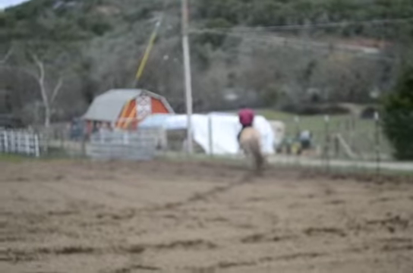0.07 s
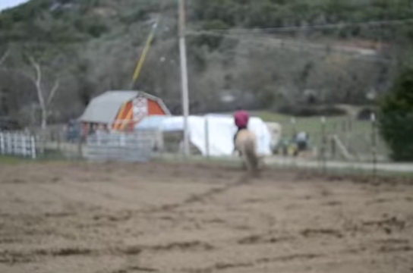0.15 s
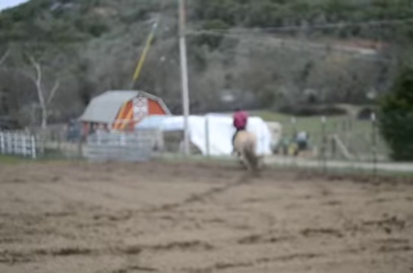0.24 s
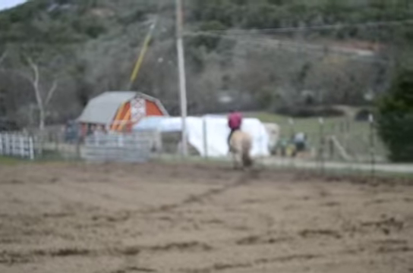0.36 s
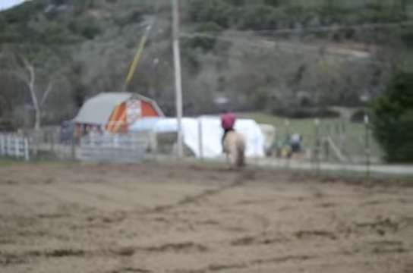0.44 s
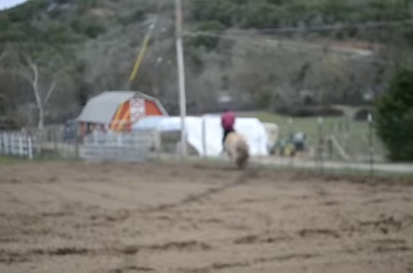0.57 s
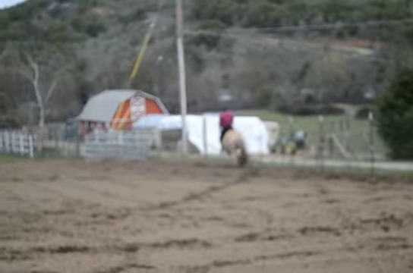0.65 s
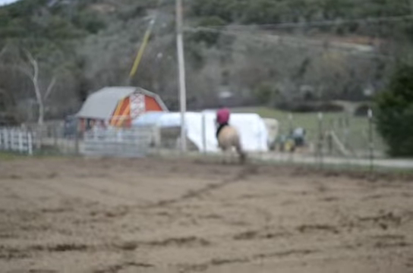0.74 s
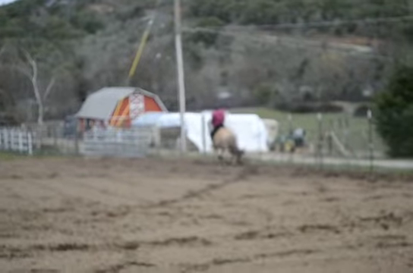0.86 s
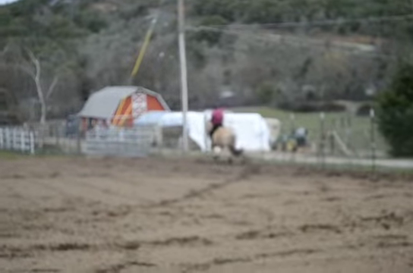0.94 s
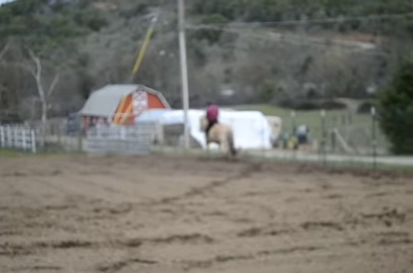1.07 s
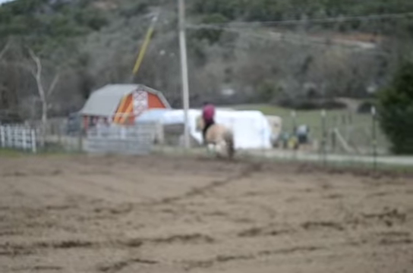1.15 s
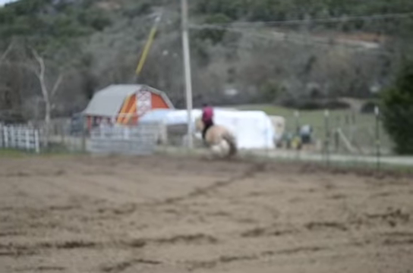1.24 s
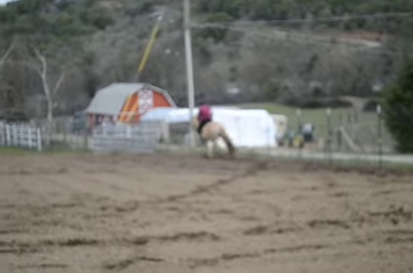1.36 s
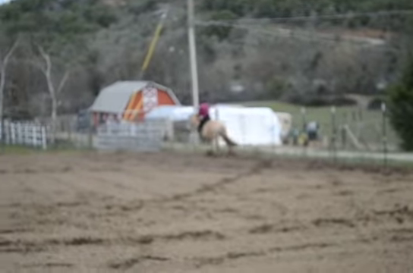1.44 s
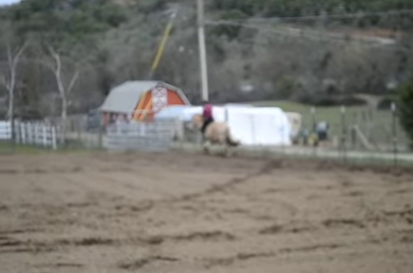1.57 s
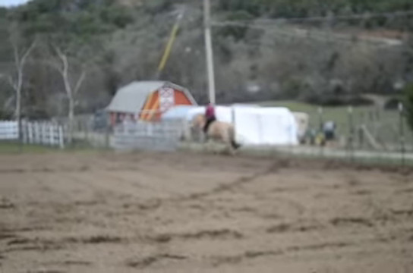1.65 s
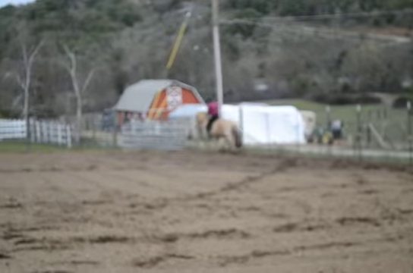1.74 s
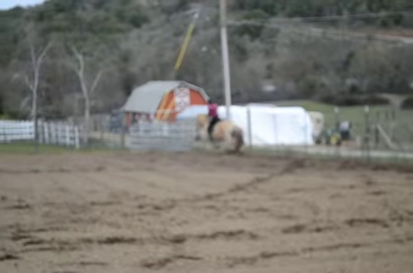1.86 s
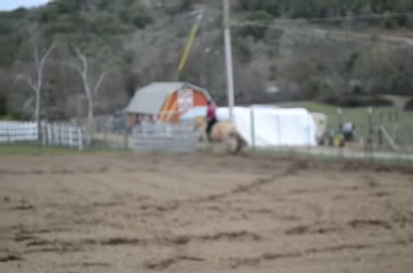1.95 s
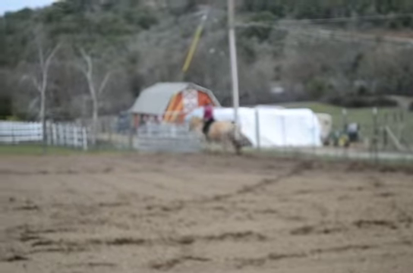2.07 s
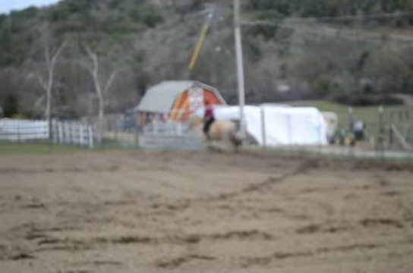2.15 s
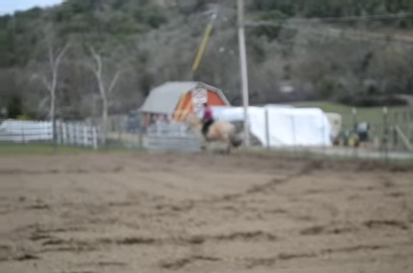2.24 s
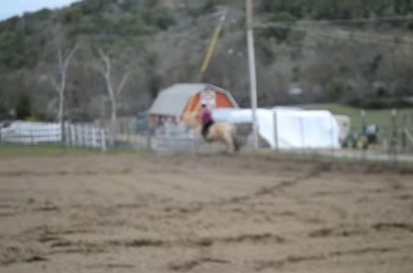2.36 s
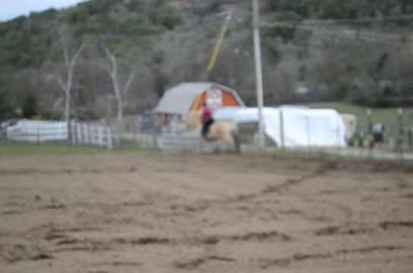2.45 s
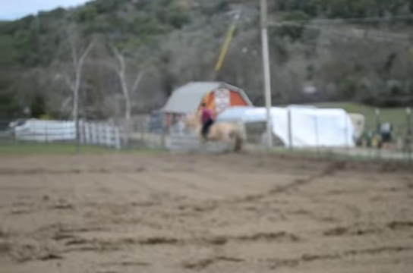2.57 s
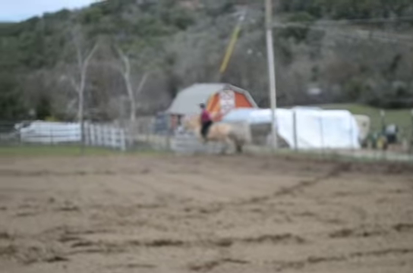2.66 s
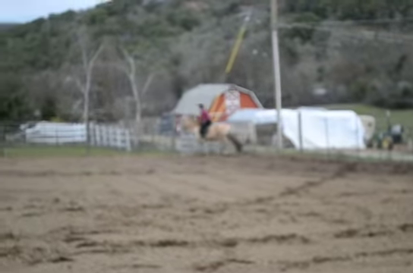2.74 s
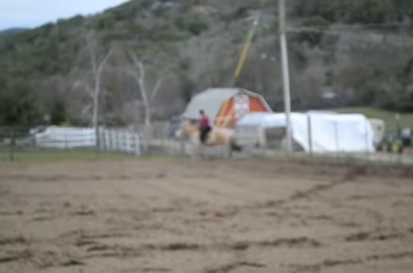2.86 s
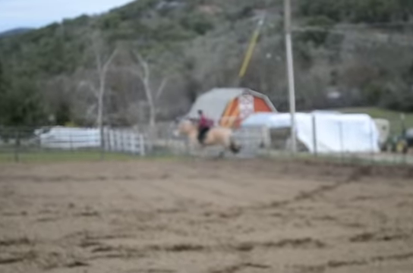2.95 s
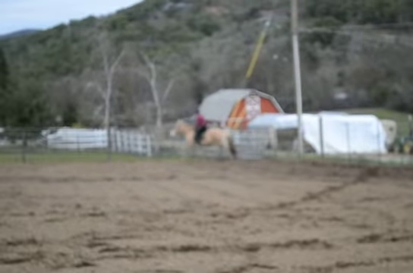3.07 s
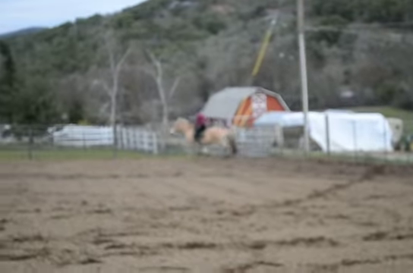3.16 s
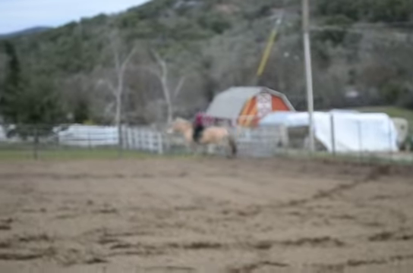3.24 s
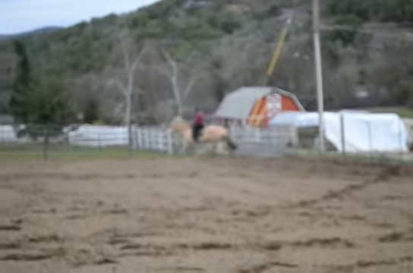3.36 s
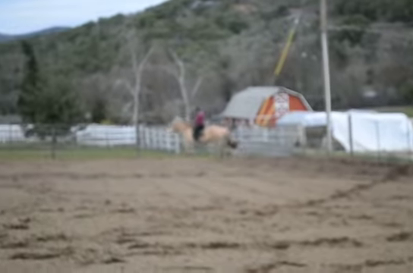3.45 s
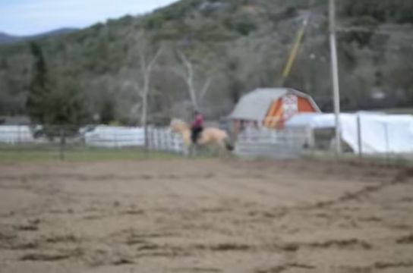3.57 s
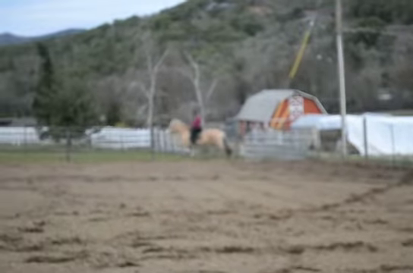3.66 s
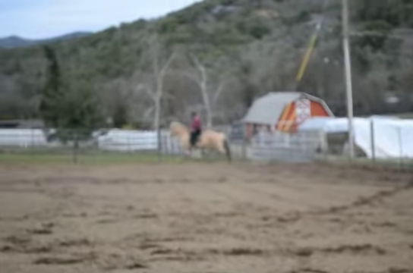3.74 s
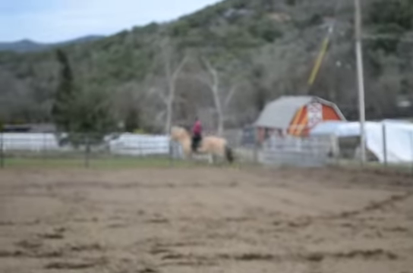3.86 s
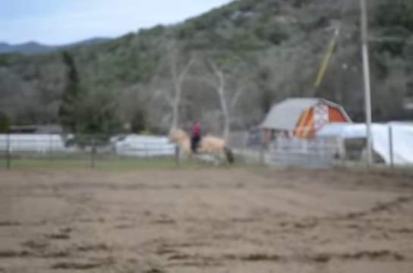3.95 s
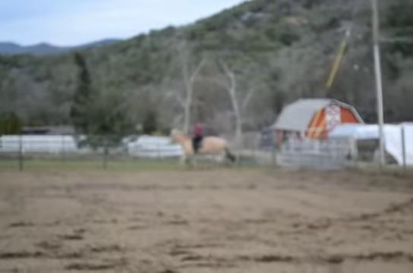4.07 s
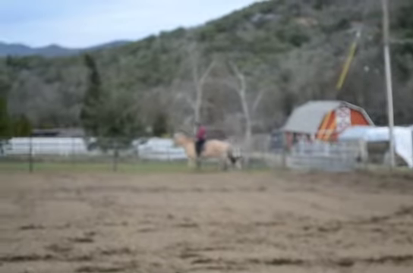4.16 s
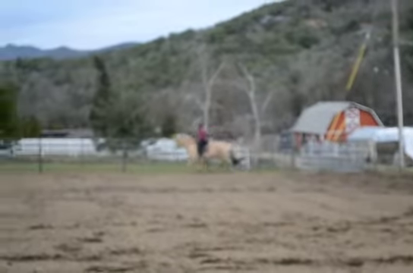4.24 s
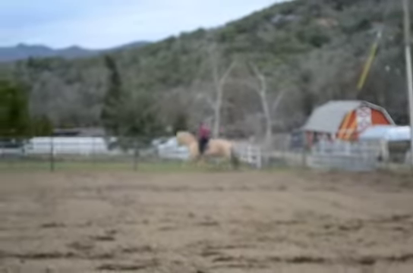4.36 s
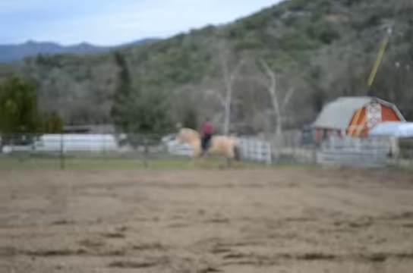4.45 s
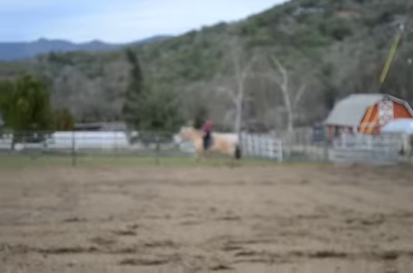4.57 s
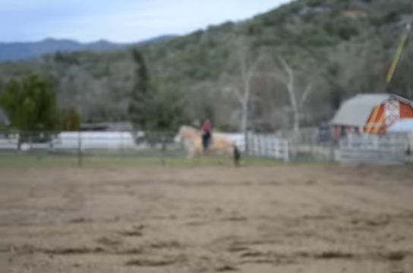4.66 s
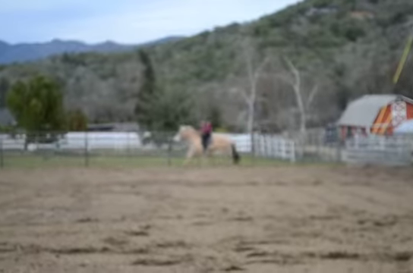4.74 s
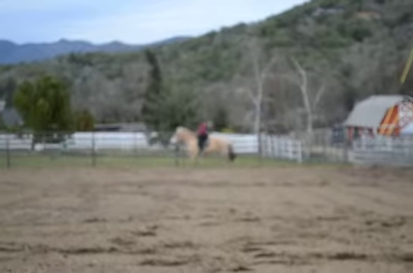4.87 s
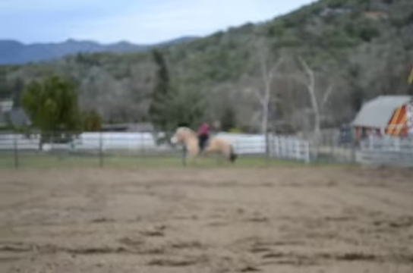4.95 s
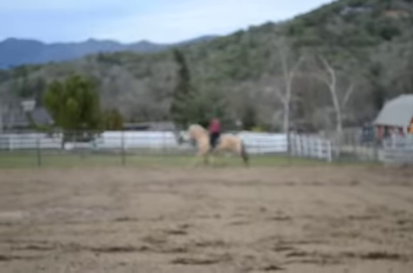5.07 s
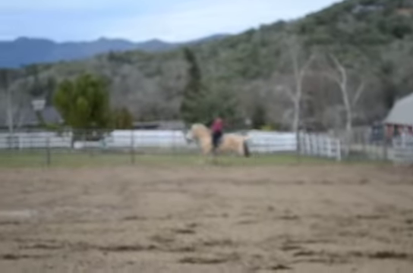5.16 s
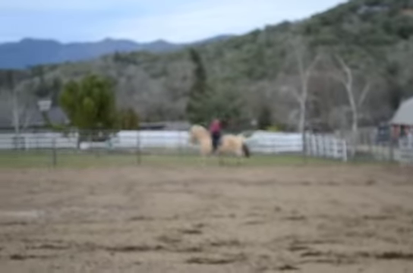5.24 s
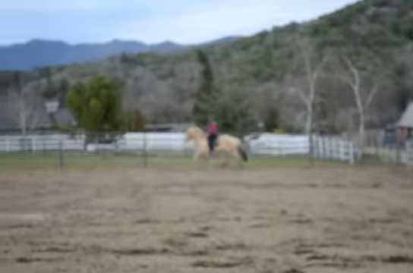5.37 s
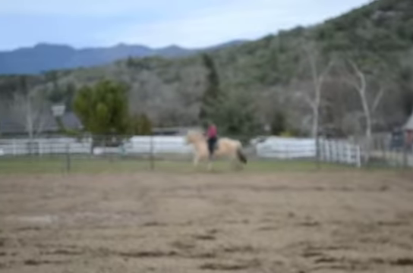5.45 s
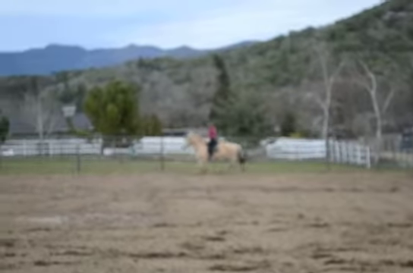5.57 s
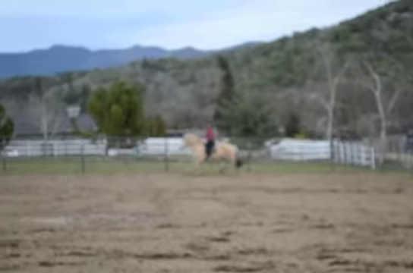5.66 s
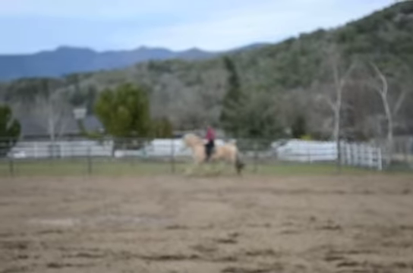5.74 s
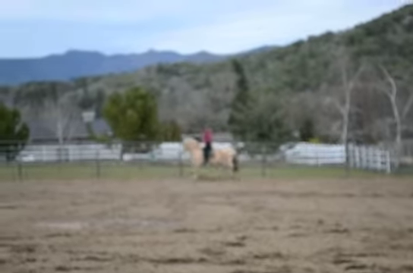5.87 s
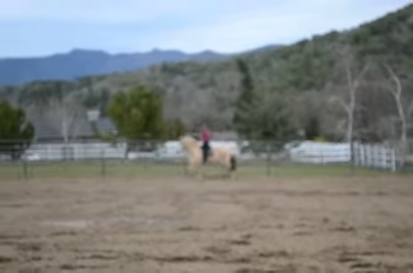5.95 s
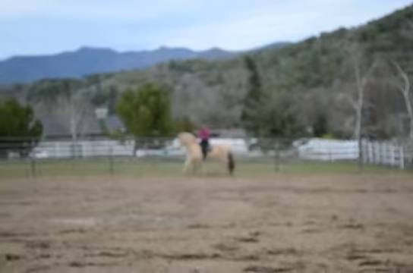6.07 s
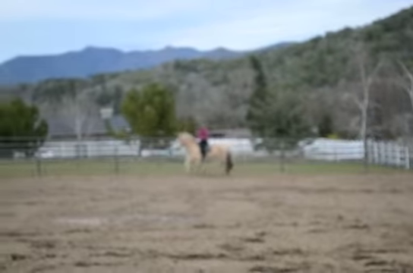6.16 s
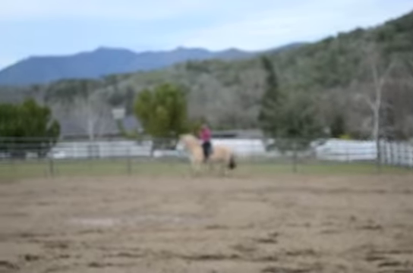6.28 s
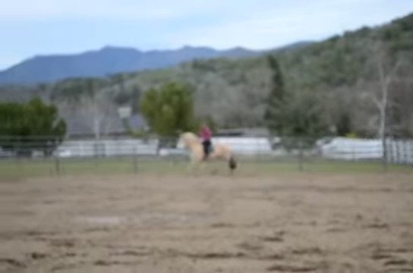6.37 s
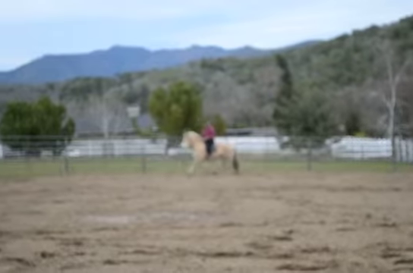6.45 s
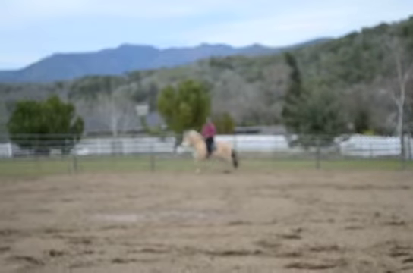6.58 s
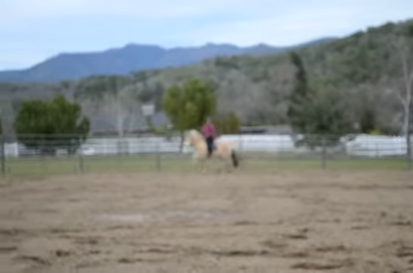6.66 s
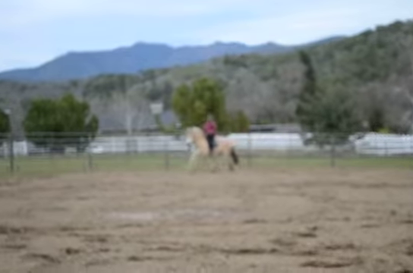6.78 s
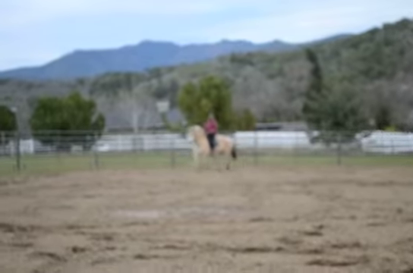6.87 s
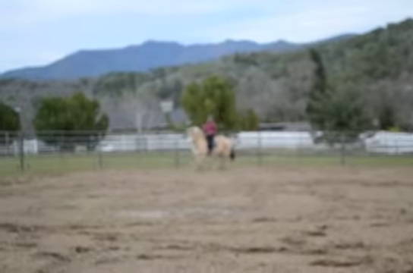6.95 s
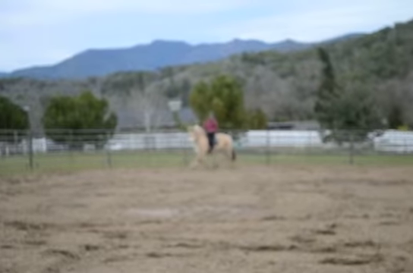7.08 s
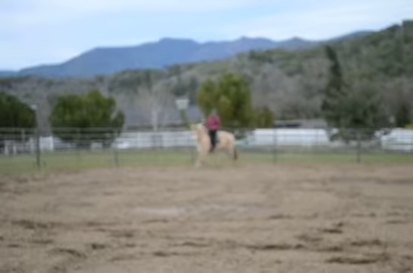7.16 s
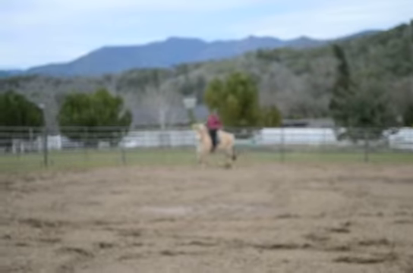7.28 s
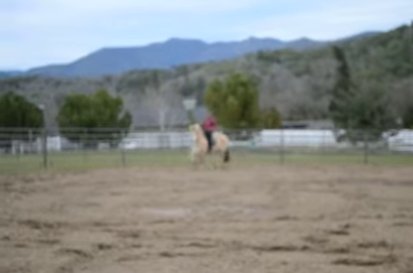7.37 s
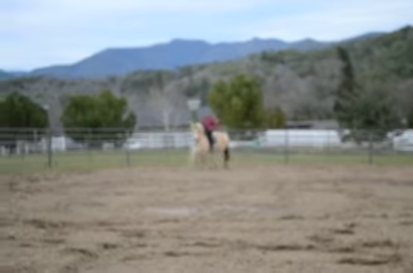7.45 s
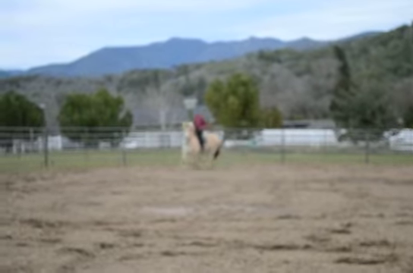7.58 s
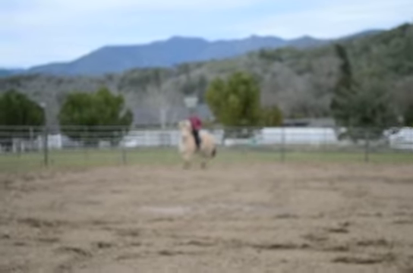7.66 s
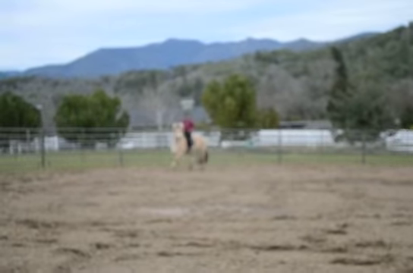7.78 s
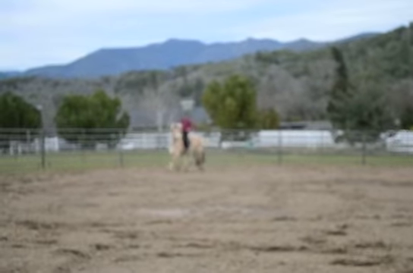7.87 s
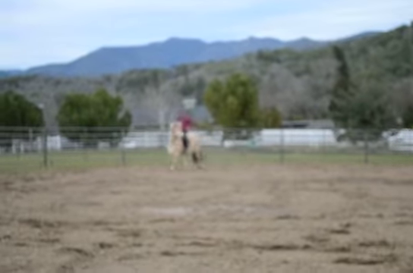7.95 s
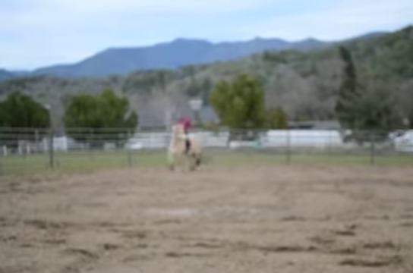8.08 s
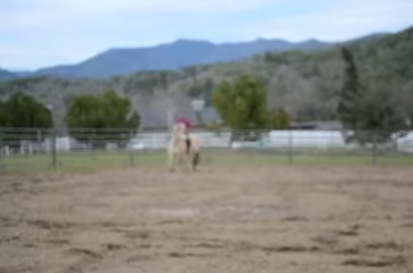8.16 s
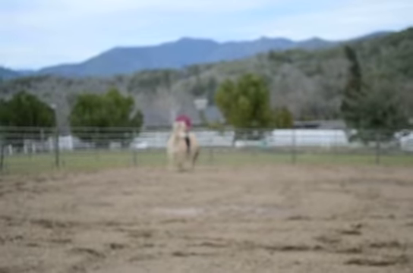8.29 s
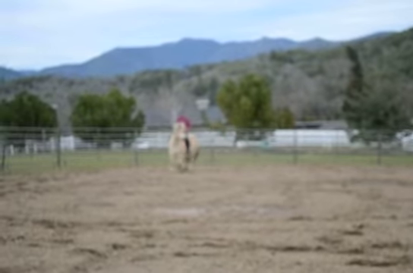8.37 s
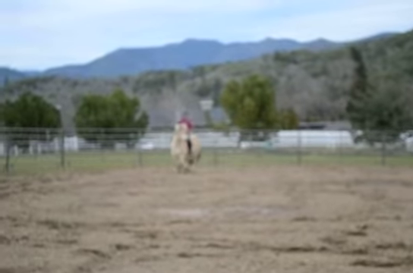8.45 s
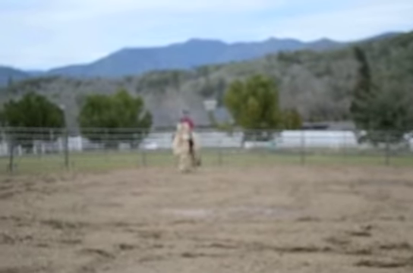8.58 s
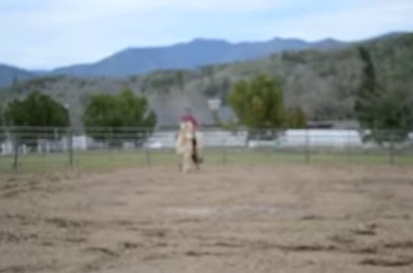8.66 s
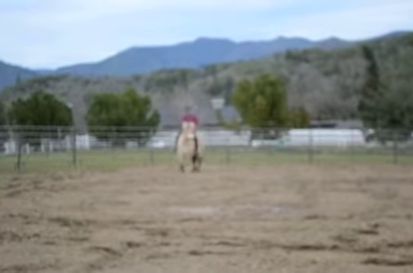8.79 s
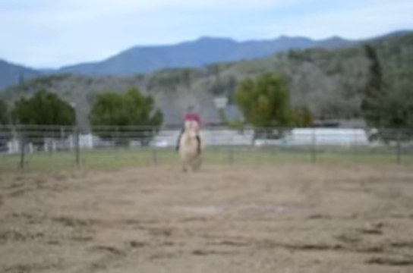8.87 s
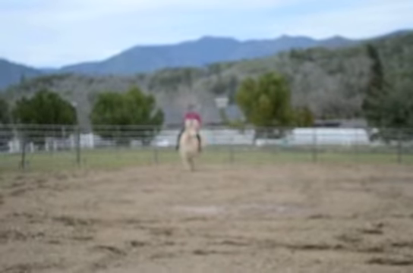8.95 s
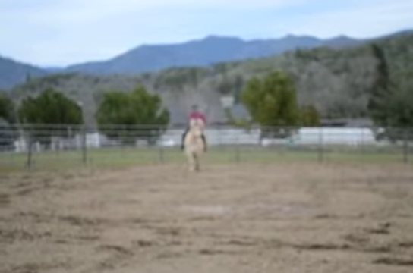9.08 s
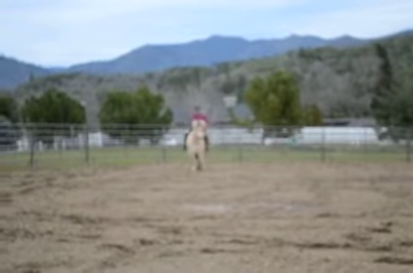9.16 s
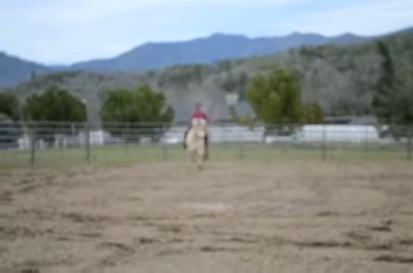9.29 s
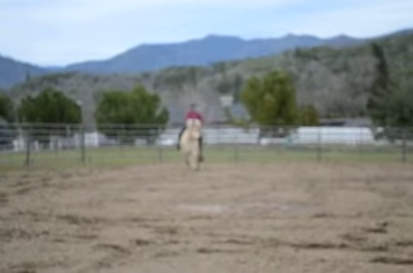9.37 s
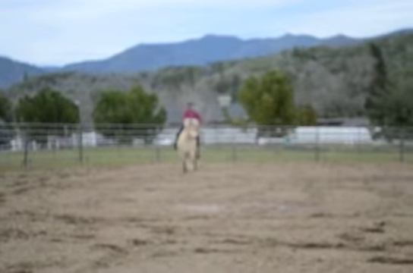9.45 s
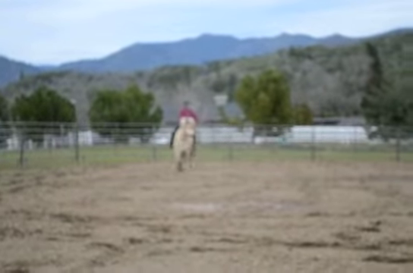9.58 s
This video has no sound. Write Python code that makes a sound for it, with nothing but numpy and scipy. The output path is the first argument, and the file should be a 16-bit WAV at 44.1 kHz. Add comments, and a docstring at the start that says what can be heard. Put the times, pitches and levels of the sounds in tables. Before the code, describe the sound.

Open-air valley ambience, quiet at first: soft distant hum, leaf hiss and faint far birds. A brief wind bump comes at 0.1 s and a hard plastic camera click near 0.4 s, with smaller ticks afterwards. Hoarse fluttering crow caws sound at about 0, 0.5, 1.0, 1.6 and 2.2 s, amid short whistles, falling songs and thin high trills. Far hooves scuff sand throughout, irregular, soft, grainy and barely audible. Rapid double chips run around 3-3.5 s and 4.8-5.5 s. A hollow woodpecker roll lasts from 4.45 to 4.75 s; another at 7.2-7.6 s carries bright ticks. Crows return at 6.3, 6.8, 6.9, 7.3, 7.7 and 8.3 s, mostly stronger, with a clear rising whistle at 6.5 s and buzzy rattles later. From about 6.2 s, breeze rumbles and pops low on the microphone, dominating until the end at roughly 9.6 s.

```python
"""A horse's hooves scuff faintly, far off on a sand arena: noise puffs full of short ringing grains. Crows caw
with fluttering harmonics; songbirds whistle, rattle, wheeze and chip with swept and shaken sines. A woodpecker
drums in two bursts, noisy blows through wood resonances, each led by a thin crack. Behind lie distant hum and
leaf hiss; a rising breeze rumbles and pops on the microphone of a handheld camera, whose body ticks now and
then."""
import sys
import numpy as np
from scipy import signal
from scipy.fft import rfft, irfft, next_fast_len
from scipy.io import wavfile
from scipy.ndimage import uniform_filter1d, map_coordinates

SR = 44100
rng = np.random.default_rng(int(sys.argv[2]) if len(sys.argv) > 2 else 0)


def waveform_to_disk(signal):
    """Save audio, clipped to [-1, 1], as 16-bit WAV at the path in sys.argv[1]."""
    frames = np.transpose(np.atleast_2d(signal))
    scaled = np.clip(frames, -1, 1) * 32767
    samples = np.round(scaled).astype(np.int16)
    wavfile.write(sys.argv[1], SR, samples)


def natural_amplitude(level_db):
    """Convert a level in decibels to a linear amplitude factor, elementwise."""
    exponent = np.asarray(level_db, float) / 20
    return 10 ** exponent


N = 424241  # samples
T = np.arange(N) / SR  # s


def unit(x):
    """Scaled to rms 1."""
    return x / np.sqrt(np.mean(x ** 2) + 1e-20)


def along(points, hz):
    """Reads (Hz, value) points on a log frequency axis."""
    f, v = np.transpose(points)
    return np.interp(np.log(hz + 1), np.log(f + 1), v)


def wobble(rate, n=N):
    """A smooth random curve, rate knots a second."""
    knots = rng.standard_normal(int(n * rate / SR) + 4)
    return map_coordinates(knots, [np.arange(n) * rate / SR])


def filtered(x, response):
    """Shapes x by a response, a function of frequency."""
    m = next_fast_len(len(x) + 8192)
    return irfft(rfft(x, m) * response(np.fft.rfftfreq(m, 1 / SR)), m)[:len(x)]


def modes(table):
    """Causal response of (Hz, width Hz, dB) resonances, summed with alternating sign."""
    def response(f):
        return sum((-1) ** k * natural_amplitude(db) * 1j * f * width / (centre ** 2 - f * f + 1j * f * width)
                   for k, (centre, width, db) in enumerate(table))
    return response


def noise(spectrum, patchy_db):
    """Coloured noise of rms 1 with time-frequency patches of random gain."""
    z = signal.stft(rng.standard_normal(N + 512), nperseg=512)[2]
    field = uniform_filter1d(rng.standard_normal(z.shape), size=6, axis=0)
    field = uniform_filter1d(field, size=6, axis=1)
    x = signal.istft(z * natural_amplitude(patchy_db * unit(field)), nperseg=512)[1][:N]
    return unit(filtered(x, lambda hz: natural_amplitude(along(spectrum, hz))))


def add(out, s, sound):
    """Lays a sound into out at time s."""
    part = out[max(round(s * SR), 0):][:len(sound)]
    part += sound[:len(part)]


def phase(hz):
    """A running phase in radians that follows a changing pitch."""
    return 2 * np.pi * np.cumsum(hz) / SR


def phrase(rows):
    """Start time, soft-edged gate and per-sample columns of one call."""
    s, *cols = np.transpose(rows)
    t = np.arange(s[0], s[-1], 1 / SR)
    gate = np.clip(np.minimum(t - s[0], s[-1] - t) / 0.002, 0, 1)
    return s[0], gate, [np.interp(t, s, c) for c in cols]


def note(s, length, first_hz, last_hz, db):
    """A straight pitch glide that swells quickly and fades."""
    crest, start_db, end_db = .3, -1.5, -6.5  # share of the length; levels against the crest
    mid_hz = first_hz + crest * (last_hz - first_hz)
    return phrase([(s, first_hz, db + start_db),
                   (s + crest * length, mid_hz, db),
                   (s + length, last_hz, db + end_db)])


def air():
    """Distant hum and leaf hiss, each coloured noise drifting in level, over a faint steady tone."""
    # far sounds of the valley: start_s, hum_level_db, hiss_level_db
    valley = [(0, -56, -58.5), (.83, -62, -61.5), (1.77, -57.5, -62), (2.62, -63.5, -63.5),
              (3.27, -59, -62.5), (4.2, -60, -67), (4.61, -57, -64), (5.1, -61.5, -66.5), (6.3, -64, -65),
              (7.3, -63, -59), (8.84, -64.5, -63.5), (9.62, -64.5, -62)]
    # colour of the distant hum: frequency_hz, relative_level_db
    hum_colour = [(35, -29), (60, -15.5), (128, -12.5), (428, -6.5), (692, 3), (874, -2.5), (1020, 0.5),
                  (1490, -11.5), (1600, -17.5), (2080, -49), (3520, -120)]
    # colour of the leaf hiss: frequency_hz, relative_level_db
    hiss_colour = [(710, -25.5), (1200, -0.5), (1530, -1.5), (1720, -1.5), (2030, -3.5), (2760, -5.5),
                   (5630, -19), (7220, -20.5), (7990, -29.5), (8770, -25.5), (11000, -42.5), (14200, -72),
                   (22000, -120)]
    # the steady tone: pitch_hz, rms_level_db
    drone_hz, drone_db = (78, -83.5)
    s, hum_db, hiss_db = np.transpose(valley)
    hum = natural_amplitude(wobble(8)) * noise(hum_colour, patchy_db=.8)
    hiss = natural_amplitude(1.4 * wobble(14)) * noise(hiss_colour, patchy_db=1.4)
    tone = natural_amplitude(drone_db) * np.sqrt(2) * np.sin(2 * np.pi * drone_hz * T)
    return natural_amplitude(np.interp(T, s, hum_db)) * hum + natural_amplitude(np.interp(T, s, hiss_db)) * hiss + tone


def chorus():
    """Many distant birds: faint short sine glides at random pitches and moments."""
    out = np.zeros(N)
    for when, pitch, slope, long, size in rng.random((420, 5)):
        length_s = .012 + .07 * long ** 2
        u = np.arange(0, 1, 1 / (length_s * SR))
        hz = 2300 * np.exp(1.15 * pitch)
        glide = 1 + 0.3 * (slope - .6) * u
        level_db = -63 - 12 * pitch - 9 * size  # the higher, the fainter
        add(out, when * N / SR, natural_amplitude(level_db) * np.sin(np.pi * u) * np.sin(phase(hz * glide)))
    return out


def ticks():
    """Plastic creaks of the camera body: noise cracks of a few milliseconds, and a snap that rings it."""
    # clearest creaks: start_s, level_db (before the crack's own gain and bass cut)
    creaks = [(.4239, -49), (.7921, -52.5), (1.044, -59), (1.0974, -45.5), (1.1897, -59.5), (2.5127, -55),
              (4.0277, -63), (4.4283, -56), (5.4794, -60), (5.8042, -65), (6.7012, -58.5)]
    # resonances of the camera body: centre_hz, width_hz, relative_level_db
    shell = [(450, 300, -4), (1550, 130, 0), (1950, 150, -1), (2300, 170, -3), (3800, 2000, -14)]
    # one hard snap that rings the whole body: start_s, peak_db
    snap_s, snap_db = (.4245, -28)
    out, t = np.zeros(N), np.arange(SR // 40) / SR
    faint = rng.random((90, 2)) * [N / SR, -8] + [0, -66]  # many more, barely heard
    for s, db in [*creaks, *faint]:
        crack = rng.standard_normal(len(t)) * natural_amplitude(-60 * t / 0.0094)
        add(out, s, natural_amplitude(db + 7.0) * filtered(crack, lambda f: 1j * f / (1j * f + 2500)))
    blow = natural_amplitude(-60 * t / .0006) + .15 * natural_amplitude(-60 * t / .015) * rng.standard_normal(len(t))
    ring = filtered(blow, modes(shell))
    add(out, snap_s, natural_amplitude(snap_db) * ring / abs(ring).max())
    return out


def breeze():
    """Eddies push the membrane: lumpy rumble, deep sway and sharp-crested pushes of about one cycle."""
    # breeze strength at the microphone, which each layer offsets: start_s, level_db
    strength = [(0, -67), (.1, -46.5), (.18, -74), (1.1, -70), (1.9, -65.5), (2.1, -68), (2.24, -65),
                (2.6, -71), (2.85, -68), (3.8, -82), (4.18, -72.5), (4.38, -55.5), (4.55, -63.5),
                (4.96, -71), (5.06, -60.5), (5.14, -62), (5.26, -56.5), (5.38, -72), (5.62, -57.5),
                (5.85, -49.5), (6.05, -57.5), (6.3, -42), (6.4, -56.5), (6.67, -40), (6.75, -54),
                (6.83, -45.5), (7.07, -42), (7.21, -62), (7.34, -40), (7.58, -40.5), (7.75, -46.5),
                (7.98, -39.5), (8.49, -38.5), (8.63, -56), (8.68, -42), (8.73, -51), (8.8, -39),
                (9.1, -39.5), (9.2, -38), (9.5, -44), (9.62, -30.5)]
    # colour of the lumpy rumble: frequency_hz, relative_level_db
    buffet_colour = [(41, -35), (70, 5), (225, 1), (318, -12.5), (397, -10), (856, -22), (1000, -40.5),
                     (1300, -58.5), (2200, -120)]
    # colour of the deep sway: frequency_hz, relative_level_db
    deep_colour = [(12, -24), (30, -11.5), (70, -6.5), (110, -4), (200, -52.5), (400, -120)]
    # strongest wind pops: centre_s, level_db (before the push shape and low cut), centre_hz
    strong_pops = [(.09, -30, 178), (.118, -41.5, 150), (5.075, -42.5, 90), (5.281, -36.5, 117),
                   (5.65, -42, 110), (5.853, -37.5, 195), (5.998, -44, 203), (6.124, -38.5, 188.4),
                   (6.212, -31.5, 183), (6.26, -32, 124), (6.28, -28, 204), (6.307, -31.5, 181.5),
                   (6.577, -23, 286), (6.658, -24.5, 192), (6.699, -30, 308), (6.821, -23, 278),
                   (6.847, -30, 161), (6.972, -32, 216), (7.033, -30.5, 138), (7.07, -25, 180),
                   (7.337, -30.5, 198), (7.369, -30.5, 250), (7.388, -24, 158), (7.552, -23.5, 190),
                   (7.574, -32, 108), (7.629, -29.5, 189), (7.694, -23.5, 285), (7.778, -34.5, 248),
                   (7.832, -29, 138), (7.858, -21.5, 305), (7.957, -20.5, 212), (7.973, -24, 190),
                   (7.991, -27.5, 195), (8.043, -28.5, 260), (8.07, -27, 249), (8.098, -25.5, 229),
                   (8.117, -20.5, 210), (8.128, -32, 292), (8.158, -24.5, 170), (8.223, -29.5, 139),
                   (8.281, -28.5, 210), (8.303, -23, 238), (8.318, -28, 255), (8.379, -26.5, 337),
                   (8.394, -35, 324), (8.673, -27, 160), (8.788, -30, 158), (8.851, -26, 180),
                   (8.864, -28.5, 261), (8.922, -30, 222), (8.937, -29, 188), (9.013, -30, 190),
                   (9.035, -18.5, 243), (9.173, -27, 220), (9.185, -24.5, 180), (9.213, -27.5, 219),
                   (9.27, -27, 250), (9.349, -25.5, 188), (9.442, -32.5, 213), (9.595, -23.5, 224)]
    buffet_db, sway_db = -6, -9.5  # both layers over the breeze
    sway_grows = 0.86  # how far the sway follows the swings of the breeze
    eddies_per_s, eddy_hz = 48, 180  # small random pops: rate, middle of the pitch range
    eddy_db, eddy_spread_db = 8, 7  # the strongest over the breeze, and the range below it

    level_db = np.interp(T, *np.transpose(strength))
    lumps = unit(natural_amplitude(4 * wobble(40) + 2.5 * wobble(12)) * noise(buffet_colour, patchy_db=1.5))
    deep = unit(natural_amplitude(3.6 * wobble(16) + 3.5 * wobble(5)) * noise(deep_colour, patchy_db=0.0))
    deep_db = level_db.max() + sway_grows * (level_db - level_db.max()) + sway_db

    when, size, pitch = rng.random((600, 3)).T
    when = when * 600 / eddies_per_s
    small_db = np.interp(when, T, level_db) + eddy_db - eddy_spread_db * size
    small = np.c_[when, small_db, eddy_hz * np.exp(.8 * (pitch - .5))]
    pops, pushes = [*strong_pops, *small[when < T[-1]]], np.zeros(N)
    for (s, db, hz), (turn, wide) in zip(pops, rng.standard_normal((700, 2))):
        u = np.arange(-2, 2, hz / SR)  # time in cycles
        body = 0.43 * np.exp(-(u / (0.53 + .06 * wide)) ** 2)
        crest = 0.49 * np.exp(-(u / 0.2) ** 2)
        push = (body + crest) * np.cos(2 * np.pi * u + 0.97 * turn)
        add(pushes, s - 2 / hz, natural_amplitude(db + 3.5) * push)
    pushes = filtered(pushes, lambda f: f ** 2 / (f ** 2 + 60 ** 2))  # low cut
    return natural_amplitude(level_db + buffet_db) * lumps + natural_amplitude(deep_db) * deep + pushes


def woodpecker():
    """Even rolls of beak blows ring a hollow trunk; a thin crack comes just before each blow."""
    # rolls: first_blow_s, end_s, gap_s, level_db (before blow gain and resonance), swell_db over the roll
    rolls = [(4.451, 4.765, .0482, -34, -2.5), (7.218, 7.24, .047, -36, 0), (7.259, 7.615, .0471, -43, 7)]
    # resonances of the hollow wood: centre_hz, width_hz, gain_db
    trunk = [(690, 350, -12.5), (1045, 157, 6), (1800, 63, -35)]
    crack_db, crack_lead_s = -18.5, 0.021
    blows, cracks, t = np.zeros(N), np.zeros(N), np.arange(SR // 100) / SR
    for first, end, gap, db, swell_db in rolls:
        times = np.arange(first, end, gap)
        levels_db = db + swell_db * (times - first) / (end - first)
        for s, level_db, (size, bright) in zip(times, levels_db, rng.standard_normal((12, 2))):
            blow = natural_amplitude(-60 * t / 0.0095) + 0.38 * natural_amplitude(-60 * t / 0.025) * rng.standard_normal(len(t))
            add(blows, s, natural_amplitude(level_db + 13.5 + 1.5 * size) * blow)
            fade_db = level_db + crack_db + 1.9 * bright - 60 * t / 0.014
            add(cracks, s - crack_lead_s, natural_amplitude(fade_db) * rng.standard_normal(len(t)))
    return filtered(blows, modes(trunk)) + filtered(cracks, modes([(5500, 2200, 0)]))


def wheezes():
    """Wheezy high songs: a tone shaken so fast and wide that it smears into a band."""
    # wheezes: start_s, length_s, first_hz, last_hz, crest_level_db (before random flicker)
    songs = [(0.434, 0.27, 6430, 5850, -68.5), (6.45, 0.3, 5440, 4800, -68.5),
             (6.61, 0.066, 5500, 6260, -63), (9.28, 0.18, 5180, 5000, -63.5)]
    out = np.zeros(N)
    for row in songs:
        s, gate, (hz, db) = note(*row)
        turn = phase(hz * (1 + 0.066 * wobble(1200, len(hz))))
        add(out, s, gate * natural_amplitude(db + 3.6 * wobble(63.0, len(hz))) * np.sin(turn))
    return out


def small_notes(rows, length_s, sweep, arch, scatter):
    """Tiny sine notes from (s, dB, Hz) rows; sweep, arch and random scatter are shares of the pitch."""
    out = np.zeros(N)
    u = np.arange(0, 1, 1 / (length_s * SR))
    bend = sweep * (u - .5) - arch * (2 * u - 1) ** 2
    for (s, db, hz), off in zip(rows, rng.standard_normal(90)):
        turn = phase(hz * (1 + scatter * off + bend))
        add(out, s - .002, natural_amplitude(db - 5.0) * np.sin(np.pi * u) * np.sin(turn))
    return out


def double_chips():
    """Double high chips: pairs of short rising sweeps 12 ms apart; a few, in step with the woodpecker's second
    roll, are thin high cracks of its blows."""
    # pairs of short rising sweeps: start_s, first_relative_level_db, second_relative_level_db
    pairs = [(2.941, -70, -60), (3.053, -56, -60), (3.162, -54, -54), (3.275, -56, -68), (3.309, -59, -56),
             (3.387, -57, -74), (3.497, -58, -63), (4.761, -65, -54), (4.872, -52.5, -61),
             (4.968, -60, -74), (4.983, -55, -55), (5.077, -60.5, -70), (5.093, -56, -52.5),
             (5.202, -50, -66), (5.302, -65, -49), (5.423, -55, -56), (5.519, -57, -70), (5.534, -60, -60),
             (6.326, -58.5, -70), (7.268, -54, -68), (7.29, -58, -68), (7.336, -58, -70), (7.43, -58, -68),
             (7.476, -55, -71), (8.751, -57, -66), (8.814, -52.5, -50.5), (8.857, -57, -62),
             (8.939, -53.5, -62), (8.975, -57, -70), (9.073, -58, -59), (9.182, -54.5, -68),
             (9.434, -58, -68), (9.485, -59, -69)]
    sweep_hz, gap_s = 5540, .012
    rows = [(s + k * gap_s, db, sweep_hz) for s, *pair in pairs for k, db in enumerate(pair)]
    return small_notes(rows, length_s=.009, sweep=.16, arch=0, scatter=.035)


def tseets():
    """Trills of thin high notes, small pitch arches that fade and sag along the trill."""
    # trills: start_s, end_s, first_relative_level_db, first_hz
    trills = [(0.483, .75, -63, 8370), (1.349, 1.61, -68, 8360), (2.2, 2.285, -69.5, 8350)]
    gap_s, fade_db_per_s, sag_hz_per_s = .034, 15, 850
    rows = [(s + late, db - fade_db_per_s * late, hz - sag_hz_per_s * late)
            for s, end, db, hz in trills for late in np.arange(0, end - s, gap_s)]
    return small_notes(rows, length_s=.022, sweep=-.01, arch=.06, scatter=.008)


def rattles():
    """Buzzy notes: a gliding tone chopped and shaken in pitch about 70 times a second."""
    # rattles: start_s, length_s, first_hz, last_hz, crest_level_db (scales a chopped tone of rms 1)
    buzzes = [(7.041, 0.097, 2320, 2380, -57), (8.563, 0.13, 2324, 2635, -57),
              (9.375, .18, 2320, 2634, -56.5), (9.562, 0.13, 2570, 2720, -59)]
    out = np.zeros(N)
    for row in buzzes:
        s, gate, (hz, db) = note(*row)
        beat = phase(70 * (1 + 0.18 * wobble(40, len(hz))))
        turn = phase(hz * (1 + 0.058 * np.cos(beat) + 0.035 * wobble(195, len(hz))))
        chopped = np.clip(np.sin(beat) + 0.95, 0, 1) * np.sin(turn)
        add(out, s, gate * natural_amplitude(db) * unit(chopped))
    return out


def whistles():
    """Songbird whistles and long gliding songs: sines wavering in pitch and level."""
    # long songs, one list each: start_s, pitch_hz, rms_level_db (before wavering)
    songs = [
        [(.925, 4410, -63), (.995, 4186, -64), (1.079, 3560, -61), (1.102, 3310, -64), (1.191, 2280, -62),
         (1.23, 2100, -70.5)],
        [(1.75, 5124, -69), (1.804, 4950, -65), (1.914, 4590, -63), (2.046, 4650, -69), (2.12, 3970, -65),
         (2.204, 3870, -54), (2.23, 3873, -77)],
        [(6.49, 2720, -63), (6.518, 2938, -58), (6.534, 3200, -48), (6.562, 3416, -45), (6.83, 3530, -69)],
        [(7.3, 4330, -69), (7.344, 4072, -60.5), (7.464, 3415, -54), (7.61, 2225, -63), (7.72, 1834, -69)],
    ]
    # short whistles: start_s, length_s, first_hz, last_hz, crest_rms_level_db (before wavering)
    short = [(0, 0.085, 2850, 2210, -57), (.01, .14, 7150, 7050, -77), (0.087, 0.032, 2790, 2600, -58.5),
             (.135, 0.043, 3970, 3760, -67), (0.202, 0.048, 2930, 2580, -57),
             (0.263, 0.17, 4257, 3656, -70), (0.308, 0.067, 2990, 2520, -58), (0.317, .11, 5400, 5800, -71),
             (.44, .03, 2480, 2520, -58), (.575, 0.035, 2500, 2460, -58), (0.644, .06, 2080, 2150, -59.5),
             (0.727, 0.052, 3572, 3680, -64), (0.84, .09, 3716, 3640, -62.5), (1.367, 0.1, 5670, 5264, -73),
             (1.59, .065, 5300, 5150, -70), (1.673, 0.14, 3950, 3870, -68), (3.54, .09, 4560, 4220, -71),
             (3.62, 0.12, 4260, 4650, -71), (3.9, 0.19, 4600, 5100, -68.5), (3.921, 0.16, 4970, 5440, -60),
             (5.88, 0.17, 5620, 5500, -70.5), (6.104, .09, 5390, 5100, -71), (6.632, 0.15, 6700, 7050, -71),
             (6.85, 0.11, 5370, 5720, -71.5), (7.127, .03, 3300, 3620, -56.5),
             (7.148, .035, 3630, 3040, -55.5), (7.999, 0.068, 2985, 3280, -54),
             (8.06, 0.087, 3510, 3270, -59.5), (8.199, 0.092, 7300, 6550, -76),
             (7.982, 0.25, 6170, 6550, -78), (8.16, 0.069, 2130, 2267, -60),
             (8.295, 0.038, 5820, 5600, -59.5), (8.365, 0.043, 5530, 5270, -59.5),
             (8.504, 0.093, 5450, 5050, -67), (8.66, 0.11, 5230, 4760, -73), (8.69, .08, 2830, 2856, -78),
             (8.843, 0.015, 2750, 2755, -54), (8.875, .015, 2780, 2770, -64),
             (8.969, 0.018, 2700, 2700, -55.5), (8.999, .015, 2667, 2600, -57),
             (9.235, 0.025, 2780, 2790, -51.5), (9.268, 0.02, 2690, 2650, -58),
             (9.28, 0.047, 3510, 3453, -59), (9.333, 0.015, 2745, 2800, -54)]
    out = np.zeros(N)
    for s, gate, (hz, db) in [phrase(rows) for rows in songs] + [note(*row) for row in short]:
        turn = phase(hz * (1 + .009 * wobble(150, len(hz))))
        # +3 dB turns an rms level into a sine's peak
        add(out, s, gate * natural_amplitude(db + 3 + 3.2 * wobble(60, len(hz))) * np.sin(turn))
    return out


def crows():
    """Harmonics and breath noise through a throat, arching up and sagging with a flutter near 60 Hz."""
    # caws: start_s, length_s, crest_share of the length, top_hz, top_level_db (both before the flutter)
    caws = [(-.01, 0.26, .27, 608, -53.5), (0.457, 0.27, .23, 550, -51), (1.016, 0.25, 0.15, 611, -53),
            (1.61, .25, 0.21, 612, -53.5), (2.249, .26, 0.18, 621, -55.5), (6.341, 0.24, 0.27, 647, -57),
            (6.787, 0.18, 0.36, 639.3, -53.5), (6.918, 0.18, .32, 551.6, -46.5),
            (7.28, 0.25, 0.36, 539, -45.5), (7.739, 0.24, 0.43, 554.4, -46), (8.346, 0.2, .24, 523, -45.5)]
    # colour of the throat: frequency_hz, relative_level_db
    throat = [(400, -40), (1000, -10), (1230, -11), (1380, 0), (1700, 0), (1950, -9), (2150, -7),
              (2600, -17), (3300, -14), (4200, -27), (5800, -26), (7500, -38)]
    rise_hz_per_s, end_hz = 1900, 440  # climbs to the top pitch, then sags to one low note
    start_db, knee_db, end_db = -7, -4, -8  # against the top level
    knee, knee_sag = .58, .62  # share of the length, share of the sag done by then
    out = np.zeros(N)
    for start, length, crest, top_hz, top_db in caws:
        s, gate, (hz, db) = phrase([
            (start, top_hz - rise_hz_per_s * crest * length, top_db + start_db),
            (start + crest * length, top_hz, top_db),
            (start + knee * length, top_hz + knee_sag * (end_hz - top_hz), top_db + knee_db),
            (start + length, end_hz, top_db + end_db)])
        n = len(gate)
        beat = phase(60 * (1 + 0.097 * wobble(25.1, n)))
        effort = (hz - hz.min()) / np.ptp(hz)  # the flutter is widest at the top of the arch
        pitch = hz * (1 + (.035 + .03 * effort) * np.sin(beat) + .008 * wobble(300, n))
        turn = phase(pitch)
        voice = unit(sum(natural_amplitude(along(throat, k * pitch)) * np.sin(k * turn) for k in range(1, 15)))
        breath = unit(filtered(rng.standard_normal(n), lambda f: natural_amplitude(along(throat, f))))
        mix = .95 * voice + .27 * breath
        flutter = (1 + .36 * np.cos(beat)) * natural_amplitude(1.5 * wobble(30, n))
        add(out, s, natural_amplitude(db) * gate * flutter * mix)
    return out


def hooves():
    """Each footfall sprays sand: a soft puff with a quick start, carrying short ringing grains."""
    # clearest hooves throwing sand: start_s, level_db (before puff and grain shaping), length_s
    steps = [(.045, -61.5, .1), (.194, -64, 0.017), (.222, -62, 0.014), (.269, -60.5, 0.072),
             (.45, -53, .015), (.709, -64, 0.022), (.885, -58.5, 0.033), (1.276, -60, 0.089),
             (1.494, -54.5, 0.053), (2.14, -60, 0.038), (2.786, -64, .12), (3.089, -58.5, 0.053),
             (3.3, -60, 0.0303), (3.627, -59.5, 0.0162), (3.772, -59.5, 0.026), (4.427, -57.5, .019),
             (4.573, -58.5, .043), (5.142, -57, 0.085), (5.232, -58.5, .021), (5.285, -56, 0.022),
             (5.338, -59, 0.077), (5.478, -56.5, 0.056), (5.706, -60.5, 0.051), (5.802, -54, 0.025),
             (6.23, -59, 0.029), (6.271, -60.5, 0.028), (6.346, -61.5, 0.15), (7.599, -56, .021),
             (7.921, -56, 0.079), (8.024, -54.5, 0.023), (8.099, -61, 0.036), (8.28, -55.5, 0.044),
             (8.641, -60, 0.02), (9.122, -57, 0.076), (9.273, -61, 0.086), (9.377, -57, .036),
             (9.42, -58, .064), (9.56, -63, 0.12)]
    # colour of the sand: frequency_hz, relative_level_db
    sand = [(800, -35.5), (1800, -4.5), (2500, 1), (4200, -3.5), (5300, -13.5), (7000, -25), (11000, -34)]
    grain_hz, scuff_db = 3500, -60  # grain pitch before scatter; strongest random small scuff
    out, t = np.zeros(N), np.arange(SR // 100) / SR
    small = rng.random((16, 3)) * [N / SR, -8, .03] + [0, scuff_db, .012]
    for s, db, length in [*steps, *small]:
        u = np.arange(SR // 4) / SR / max(length, .008)  # time in puff lengths
        puff = unit(filtered(rng.standard_normal(len(u)), lambda f: natural_amplitude(along(sand, f))))
        add(out, s, natural_amplitude(db - 1.5) * puff * (1 - np.exp(-u / 0.058)) * np.exp(-u ** 3.5))
        count = 3 + round(300 * length)
        for when, pitch, size in rng.random((40, 3))[:count]:
            hz = grain_hz * np.exp(.8 * (pitch - .6))
            grain = np.sin(2 * np.pi * hz * t) * (t / 0.0012) * np.exp(1 - t / 0.002)
            add(out, s + when * length, natural_amplitude(db - 3.0 - 10.0 * size) * grain)
    return out


def echo(x):
    """Open-air echo: a noise tail in which each frequency dies at its own speed."""
    # echo of barns and trees: frequency_hz, t60_s
    decay = [(300, 0.71), (2000, 0.27), (9000, 0.31)]
    hz, t, z = signal.stft(rng.standard_normal(SR // 2), SR, nperseg=256)
    tail = signal.istft(z * natural_amplitude(-60 * t / along(decay, hz)[:, None]), SR, nperseg=256)[1]
    late = np.pad(x, (300, 0))  # samples of delay
    return signal.fftconvolve(late, tail / np.linalg.norm(tail))[:N]


def scene():
    """Crows, songbirds and woodpecker get the echo; the other layers stay dry."""
    caw = crows()
    high = whistles() + rattles() + double_chips() + tseets() + wheezes() + chorus()
    drum = woodpecker()
    wet = echo(natural_amplitude(-10) * caw + natural_amplitude(-9) * high + natural_amplitude(-9) * drum)
    return (caw + high + drum + wet + hooves() + air() + breeze() + ticks())[None]


def band_limit(x):
    """A steep low-pass at the top of the band."""
    return signal.sosfilt(signal.butter(12, 11100, fs=SR, output="sos"), x)


def record(dry):
    """The input stage saturates softly and a low sampling rate cuts the top."""
    ceiling = .125  # the loudest pops are rounded off towards this amplitude
    held = dry[0] / (1 + abs(dry[0] / ceiling) ** 4) ** (1 / 4)
    # steep cut at 10600 Hz over a faint full-band leak
    mix = filtered(held, lambda hz: 1 / (1 + (hz / 10600) ** 40) + natural_amplitude(-59))
    return band_limit(mix[None])


dry = scene()
out = record(dry)
waveform_to_disk(out)
```